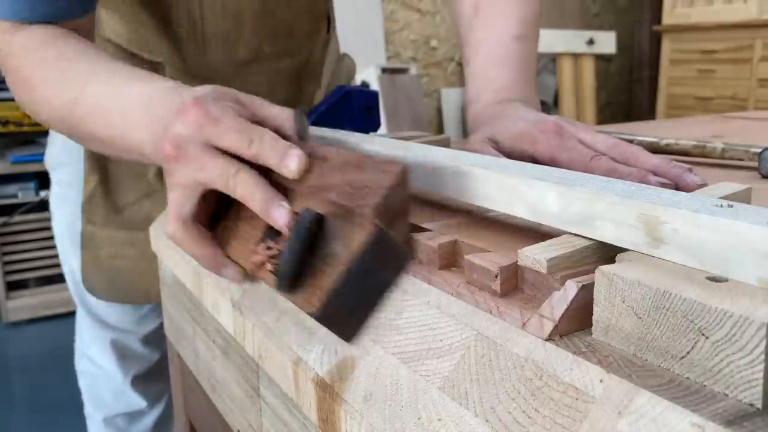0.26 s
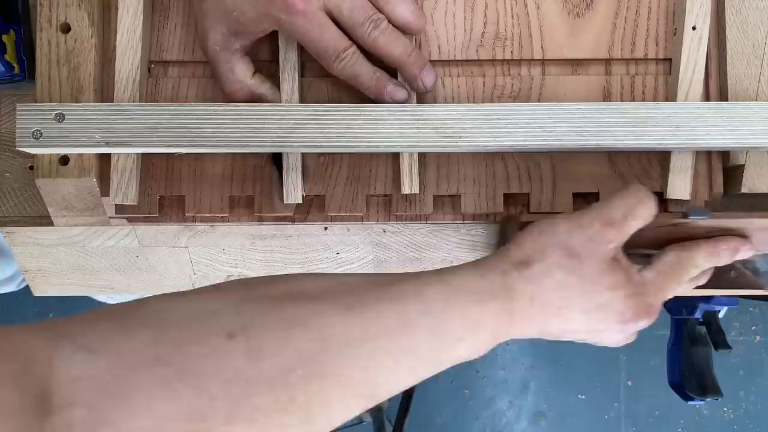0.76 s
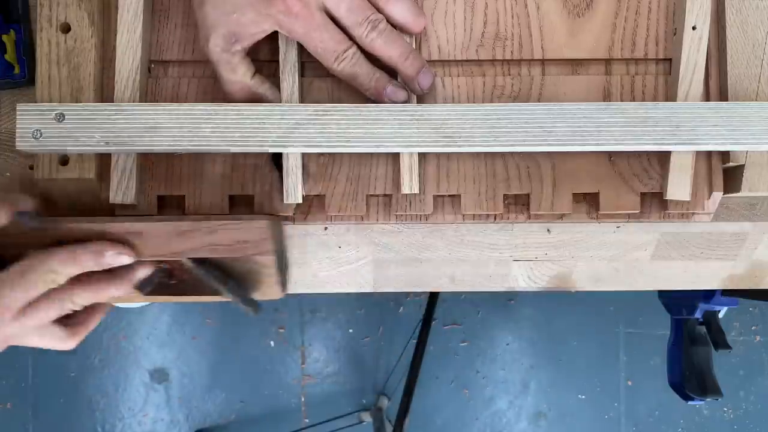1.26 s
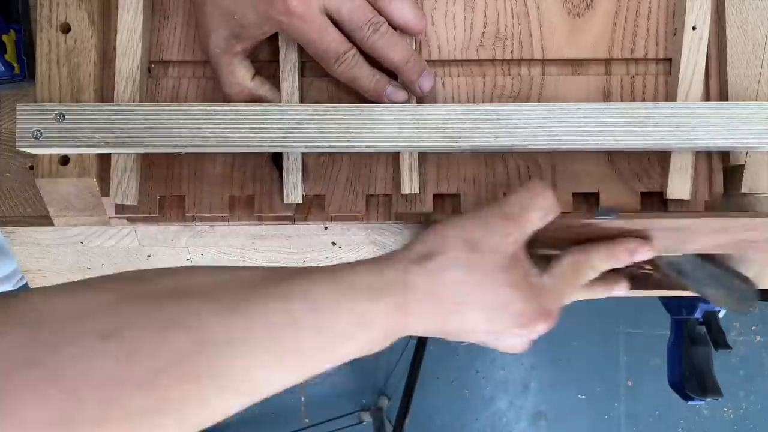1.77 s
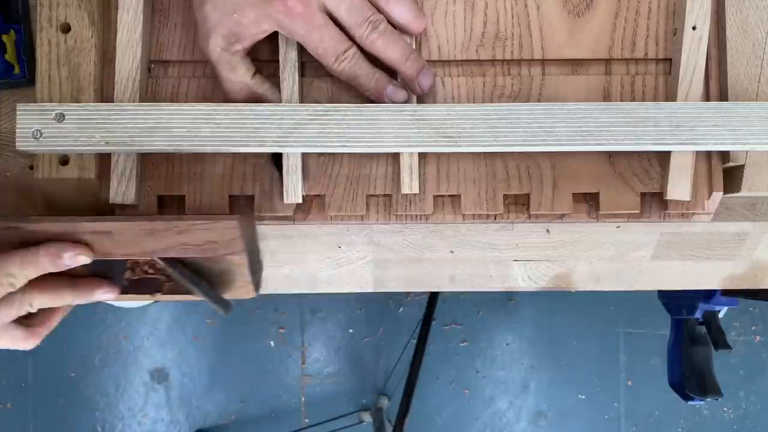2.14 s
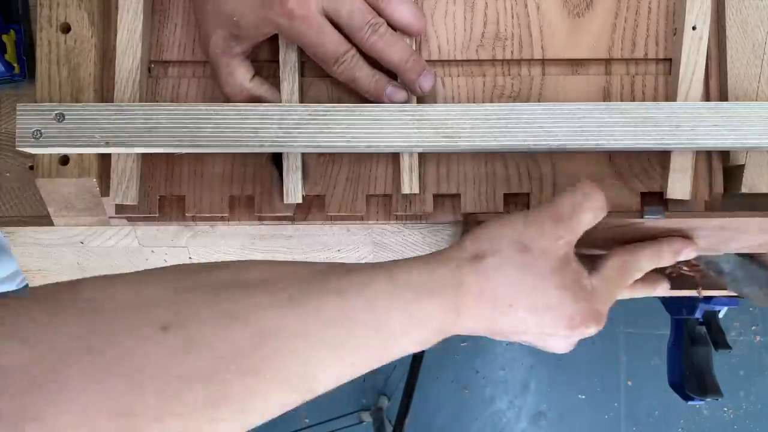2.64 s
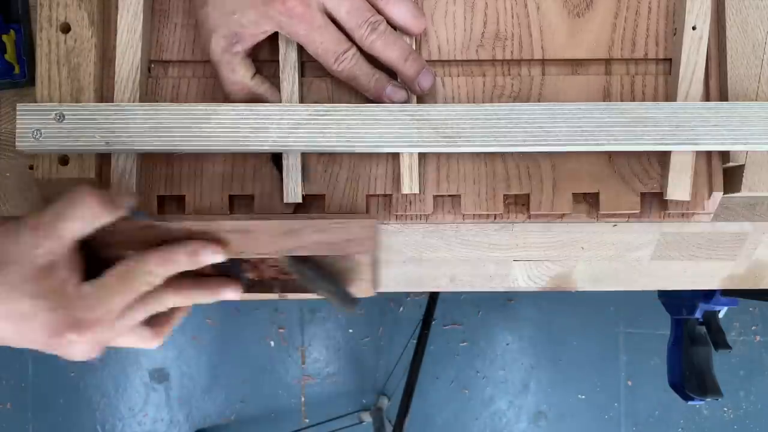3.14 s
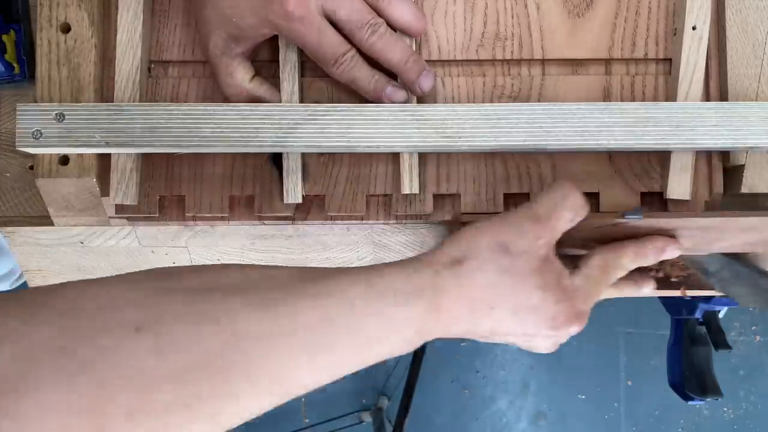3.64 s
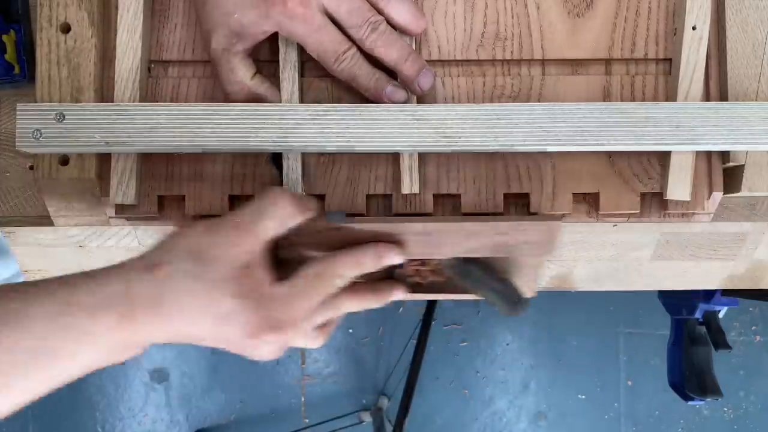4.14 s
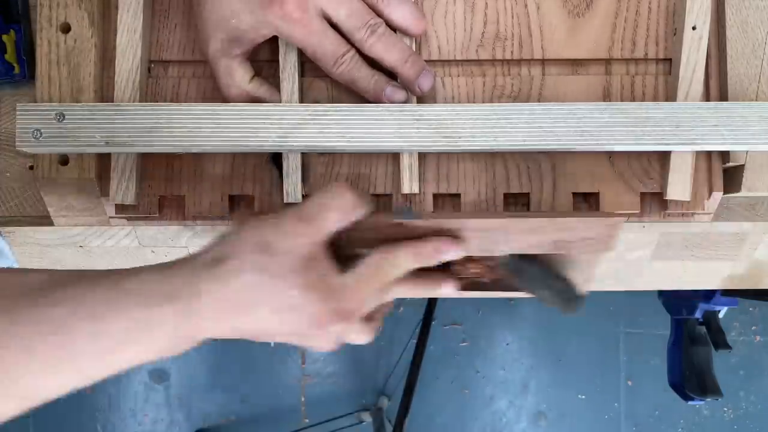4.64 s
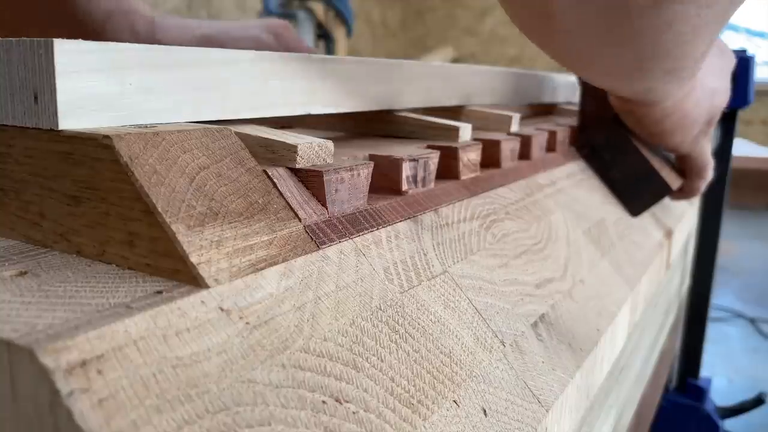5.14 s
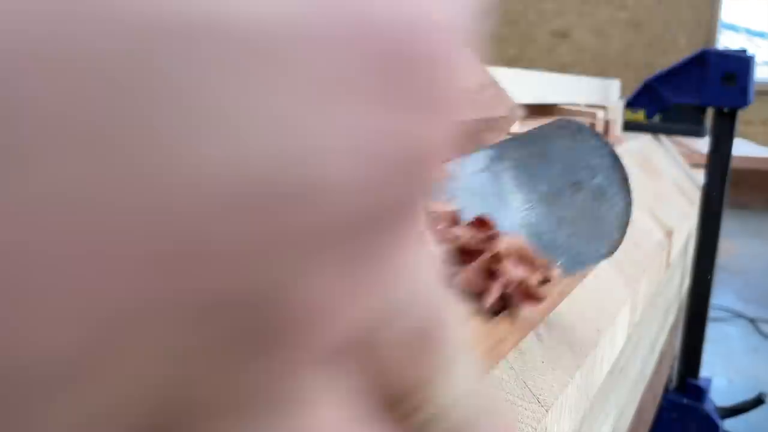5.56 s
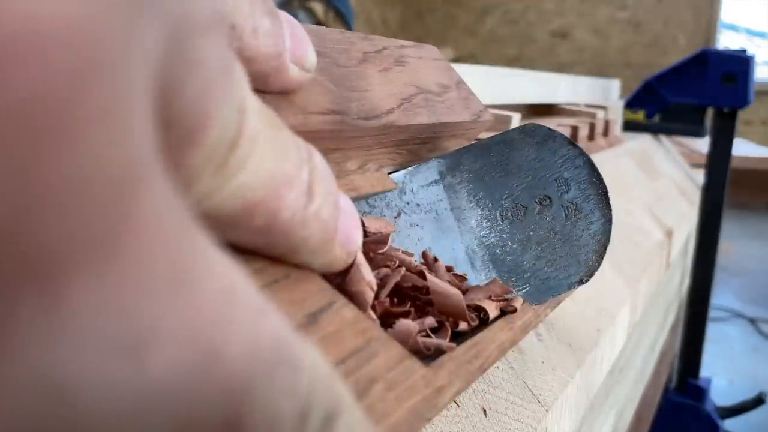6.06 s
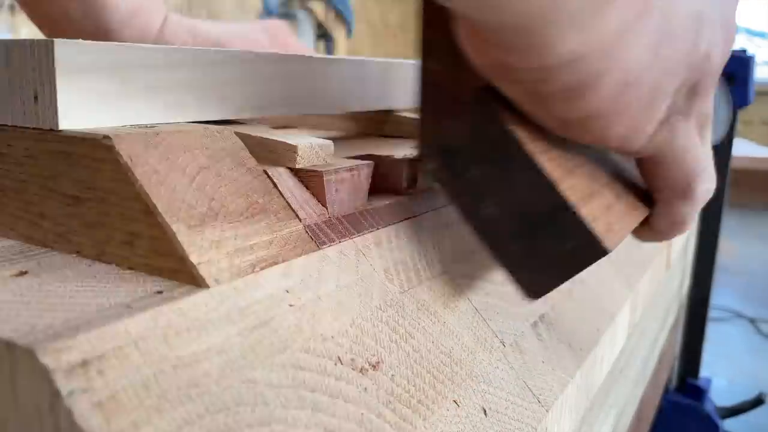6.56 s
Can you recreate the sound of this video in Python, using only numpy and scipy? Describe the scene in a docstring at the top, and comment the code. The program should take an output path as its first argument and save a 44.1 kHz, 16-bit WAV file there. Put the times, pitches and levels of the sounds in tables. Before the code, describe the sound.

Close stereo pickup of a small hand plane on a wooden bench. Three quick, bright, hurried rasps come first, then five longer, lower scrapes about a second apart. Between them the sole slides back with small dry knocks and papery shavings rustle over a faint, buzzy low rumble. After five seconds there is one crisp clatter and rustle, then only the weak rumble, fading.

```python
"""First comes the rasp of a small hand plane stroked along a board edge, over a faint bass floor.
Torn wood fibres make lumpy noise that rings the board and the iron (the blade). The rasps are
spliced in at three playback speeds, with the left side a few milliseconds late.
From .8 s the sole (the plane's underside) slides and knocks and shavings rustle, as shaped noise.
This bench layer and a room rumble are chopped by a buzz of short loud windows; the rumble sinks at the end."""
import sys
import numpy as np
from scipy import signal
from scipy.fft import rfft, irfft, next_fast_len
from scipy.io import wavfile
from scipy.ndimage import uniform_filter1d, map_coordinates

SR = 44100
rng = np.random.default_rng(int(sys.argv[2]) if len(sys.argv) > 2 else 0)


def attenuation_scalar(level_db):
    """Turn a level in dB into a linear amplitude multiplier (20 dB per decade)."""
    decades = np.asarray(level_db, float) / 20
    return 10 ** decades


def master_out(mix):
    """Clip the mix to full scale and print it as 16-bit PCM to the path in sys.argv[1]."""
    frames = np.transpose(np.atleast_2d(mix))
    ceiling = np.clip(frames, -1, 1)
    pcm = np.round(ceiling * 32767).astype(np.int16)
    wavfile.write(sys.argv[1], SR, pcm)


N = 299859  # length [samples]

# All levels in the tables are relative: the functions below mix them further.
# Splices of the rasp: (start [s], end [s], playback speed, motor hum [dB])
RASP_SPLICES = [(0, .798, 1.368, -61), (.798, 1.213, 1.185, -68), (1.733, 2.09, 1, -63),
                (2.648, 3.024, 1, -61), (3.625, 4.024, 1, -70), (4.562, 4.876, 1, -74)]
# Strokes of the iron, the second a short pull back:
# (bite [s], length [s], level [dB], sag up to the lift [dB], highest chatter centre [Hz])
STROKES = [(.002, 0.18, -22.5, 3.5, 5300), (0.337, 0.092, -32.5, -5, 4600), (0.563, 0.13, -21, 4.5, 5420),
           (0.889, 0.22, -23, 2, 4650), (1.759, 0.25, -25.5, 2.5, 3920), (2.657, 0.29, -23, 1.5, 4000),
           (3.667, 0.25, -22.5, 2, 3785), (4.575, 0.2, -20.5, 5.5, 4170)]
# The iron snags in harder grain: (peak [s], 20 dB rise [s], 20 dB fall [s], level [dB], board share [dB])
GRAIN_SNAGS = [(.09, 0.13, 0.04, -21, -13.5), (0.331, 0.066, 0.013, -33.5, 8),
               (.385, .17, 0.12, -31.5, 5.5), (0.452, 0.045, 0.0085, -25.5, 7.5),
               (.59, .03, 0.017, -28.5, 4.5), (.629, 0.04, 0.089, -24.5, -8.5),
               (0.675, 0.05, 0.029, -14.5, -18.5), (0.717, 0.042, 0.084, -25.5, 0),
               (0.793, 0.061, 0.006, -25.5, -12.5), (.985, 0.097, 0.14, -22, -13.5),
               (1.85, 0.1, 0.057, -23.5, 2.5), (1.881, .05, 0.071, -20.5, -17),
               (1.938, 0.053, 0.095, -24, -4.5), (2.059, .06, 0.022, -25, -9),
               (2.668, 0.018, 0.011, -19.5, -3), (2.75, .06, 0.12, -29, -1.5),
               (2.816, 0.1234, 0.05, -23.5, -17.5), (3.761, .06, 0.28, -24.5, -11.5),
               (4.64, 0.053, 0.13, -34, -10.5), (4.675, .05, 0.036, -26, 6), (4.715, .08, 0.048, -25, -12),
               (4.789, .05, 0.092, -21, -8)]
# A bundle of fibres snaps under the edge: (time [s], level [dB])
FIBRE_SNAPS = [(.4505, -3), (.613, -5), (.629, -3), (.970, -3), (.994, -2), (1.880, -4), (1.934, -3),
               (2.693, -5), (2.815, -3), (3.749, -4), (3.762, -4), (3.789, -2), (4.607, -6), (4.631, -3),
               (4.717, -6)]
# Resonances of the board at playback speed 1: (frequency [Hz], width [Hz], level [dB])
BOARD_MODES = [(190, 110, -12.5), (328, 25, -9.5), (584, 420, -13), (880, 240, -2.5), (1420, 770, -8.5),
               (1614, 260, 3.5), (1960, 550, -9.5)]
# Resonances of the iron at playback speed 1: (frequency [Hz], width [Hz], level [dB])
IRON_MODES = [(2430, 77, -14.5), (3030, 546, 2.5), (3140, 110, -18.5), (3786, 380, 2), (4205, 300, -6),
              (4584, 300, -4), (5300, 1000, -11)]
# Upper resonances of the iron at playback speed 1: (frequency [Hz], width [Hz], level [dB])
IRON_OVERTONES = [(5290, 400, -5.5), (6380, 280, 5.5), (7470, 450, -5)]
# Colour of the fine fibre noise at playback speed 1: (frequency [Hz], level per Hz [dB])
FIBRE_COLOUR = [(4500, -29), (5800, 8), (6800, 4), (8300, -9.5), (9000, -25), (10500, -36.5)]
# Colour of the broad tearing noise at playback speed 1: (frequency [Hz], level per Hz [dB])
TEARING_COLOUR = [(120, -39.5), (250, -9), (1000, -0.5), (3500, 4), (8600, -3), (9200, -27.5), (14000, -40)]
# Sole or shavings tick on the bench: (time [s], peak [dB], bright share [dB])
BENCH_KNOCKS = [(1.325, -40.5, -15), (1.355, -36, -17.5), (1.412, -27, -6.5), (1.448, -33, -5),
                (1.48, -26, -27.5), (1.509, -31.5, -12.5), (1.549, -40.5, -7.5), (1.581, -41, -10.5),
                (2.231, -39.5, -5.5), (2.267, -40.5, -12.5), (2.295, -45, 1), (2.315, -44.5, -1),
                (2.333, -44, 0), (2.454, -41, -4), (3.121, -46, -15.5), (3.344, -44, 5), (3.414, -25, -9),
                (3.591, -35.5, -14), (4.079, -40.5, -32), (4.125, -34, -19.5), (4.255, -46.5, -22.5),
                (4.304, -42.5, -1.5), (4.334, -43.5, 9), (5.324, -31, -15), (5.478, -36, 13.5),
                (5.585, -40.5, 16), (6.365, -52, -35)]
# The plane slides, shavings curl out and settle; rise and fall span 20 dB:
# (peak [s], rise [s], fall [s], level [dB], fineness [0 sole, 1 shavings, 2 dust])
BENCH_RUSTLES = [(1.014, 0.11, 0.11, -33.5, 2), (1.22, 0.34, 0.18, -80.5, 0.82),
                 (1.328, 0.006, 0.18, -46.5, 1.6), (1.40, 0.12, 0.098, -45.5, 0.068),
                 (1.488, .045, 0.069, -38, 0.028), (1.57, .15, .07, -45, 0.39),
                 (1.936, 0.096, 0.097, -30.5, 2), (2.1, 0.19, .08, -58.5, 0.64),
                 (2.235, 0.013, 0.31, -54, 0.096), (2.29, 0.055, 0.17, -46.5, 1.7),
                 (2.386, 0.028, 0.093, -46.5, 2), (2.441, 0.1, .1, -42, 0.51),
                 (2.46, .02, 0.046, -38, 0.92), (2.814, 0.06, 0.11, -28.5, 2), (3.036, .3, .14, -66, 0.47),
                 (3.125, .015, 0.33, -57, 0), (3.213, 0.045, 0.24, -39.5, 1.38),
                 (3.352, .02, 0.062, -34, 2), (3.414, 0.075, .065, -38.5, 0.38),
                 (3.595, 0.0073, .04, -44, 0), (3.761, 0.058, .12, -27.5, 2), (4.036, .3, .06, -72, 0.15),
                 (4.082, 0.007, 0.056, -55.5, 0), (4.266, 0.013, 0.1, -54.5, 0.048),
                 (4.307, .005, 0.09, -41, 0.47), (4.54, .05, .1, -52, 0.042), (4.744, .12, 0.074, -27, 2),
                 (5.07, 0.029, 0.052, -54.5, 0.067), (5.285, 0.032, .3, -40.5, 0),
                 (5.335, 0.028, 0.055, -22.5, 0.15), (5.398, 0.058, 0.23, -27.5, .6),
                 (5.48, .1, .1, -34, 1.4), (5.524, 0.12, 0.1, -20.5, 0.92), (5.6, .05, 0.1, -46, 0.031),
                 (5.7, .1, .25, -64.5, 1), (6.17, 0.012, .04, -75.5, .2), (6.4, 0.055, .03, -64, 0.042)]
# Bench at rest, one row for each listening place: (sole [dB], shavings [dB], dust [dB])
STILL_BENCH = [(-77.5, -82.5, -90.5), (-83.5, -91.5, -96)]
# Resonances of the plane's body when knocked: (frequency [Hz], width [Hz], level [dB])
BODY_MODES = [(299.7, 93, -5.5), (660, 67, 1)]
# Colour of the sliding sole; the plane's body rings near 665 Hz: (frequency [Hz], level per Hz [dB])
SOLE_COLOUR = [(150, -21.5), (300, -9), (590, -6.5), (665, 5), (750, -7), (1900, -5.5), (3200, -8),
               (4500, -14.5), (7000, -42)]
# Colour of the shavings: (frequency [Hz], level per Hz [dB])
SHAVINGS_COLOUR = [(2500, -29), (4000, -2), (5500, 4.5), (7800, 1), (9500, -4.5), (12000, -39.5)]
# Colour of the dust: (frequency [Hz], level per Hz [dB])
DUST_COLOUR = [(6500, -17.5), (9500, -0.5), (11500, -6.5), (13000, -7), (15800, -8)]
# Colour of the bench heard along the board, the plane's mouth ringing: (frequency [Hz], gain [dB])
ALONG_BOARD_COLOUR = [(100, -15), (665, -12.5), (1500, -5), (2900, -2.5), (4700, -2), (5600, 1), (6500, 1),
                      (16000, -7.5)]
# Rumble level, one list for each listening place: (time [s], level [dB])
RUMBLE_LEVELS = [
    [(0.86, -63.5), (3.03, -61), (4.86, -62)],
    [(4.9, -62.5), (5.444, -61.5), (6.8, -71)],
]
# Colour of the rumble at the first listening place: (frequency [Hz], level per Hz [dB])
RUMBLE_COLOUR = [(15, -5), (28, 0), (65, -10.5), (95, -7.5), (140, -14.5), (200, -22), (500, -24.5),
                 (2000, -48), (6000, -46)]
# Colour of the rumble at the last listening place: (frequency [Hz], level per Hz [dB])
LAST_RUMBLE_COLOUR = [(2, -4.5), (18, -5.5), (32, -0.5), (45, -22.5), (65, -0.5), (100, -23.5), (300, -26),
                      (2000, -42.5), (6000, -53)]
# Chopping, one row for each listening place: (start [s], end [s], windows per second [Hz], open share [0 to 1])
CHOPPING = [(.8, 4.876, 501.1, .11), (4.876, 6.8, 300.6, .1)]

LAST_PLACE_S = CHOPPING[1][0]  # from here on the bench is heard along the board
HUM_HZ, LAST_HUM_HZ = 53, 76.5  # motor hum in the rasp at speed 1, and in the last rumble
LAG_S = 160 / 44100  # how late the left side of the rasp is at speed 1
# The sole creeps up to the edge before the bite; levels relative to the stroke
CREEP_S, START_DB, CREEP_DB, TOUCH_DB, ATTACK_S = 0.042, -42, -23, -19.5, 0.0023
ARCH_DB, FASTEST = 2.5, 0.63  # the cut swells where the hand is fastest, at this share of the stroke
RELEASE_S, TAIL_DB, TAIL_S, TAIL_END_DB = 0.059, -19, .06, -22.5  # the iron lifts, the sole trails
# Chatter centre at speed 1 at the bite, the lift and after, and how far it wanders
BITE_HZ, LIFT_HZ, TRAIL_HZ, WANDER_OCTAVES = 2900, 3050, 3460, 0.079
DIG_S, SLOWING = 0.024, 0.78  # chatter climbs after digging in (speed 1), sinks from this share of the stroke
BOARD_SLOW_DB, BOARD_FAST_DB = -6.5, -10.5  # share of the board when the hand is slow and fast
SPRAY_DB, SPRAY_S = -23, .03  # dusty hiss under the cut, and its fade in and out
GRITS, GRIT_DB, GRIT_SPREAD_DB = 300, -6.5, 7.5  # number of crumbs under the sole, their level and spread
FINENESS_DB = 10.5  # loss of a layer per step away from the fineness
SLIDE_RING_DB = -6.5  # board and iron ring under the sliding sole


def unit(x):
    """Scale to an rms (average strength) of 1."""
    return x / np.sqrt(np.mean(x ** 2) + 1e-20)


def shape(points):
    """Gain curve through (frequency, dB) points on a log axis, nearly silent outside them."""
    f, db = np.transpose(points)
    return lambda hz: attenuation_scalar(np.interp(np.log(hz + 1), np.log(f), db, left=-90, right=-90))


def modes(table):
    """Sum of resonances with alternating signs, each a peak in the frequency response."""
    def response(f):
        return sum((-1) ** k * attenuation_scalar(db) * 1j * f * width / (hz * hz - f * f + 1j * f * width)
                   for k, (hz, width, db) in enumerate(table))
    return response


def curves(rows, t):
    """One value per time for each column after the first."""
    times, *columns = np.transpose(rows)
    return [np.interp(t, times, column) for column in columns]


def filtered(x, response):
    """Multiply the spectrum of x by a response given as a function of frequency."""
    n = x.shape[-1]
    m = next_fast_len(n + 4096)  # spare room so that tails do not wrap round at once
    return irfft(rfft(x, m) * response(np.fft.rfftfreq(m, 1 / SR)), m)[..., :n]


def late(x, seconds):
    """Delay x by turning the phase of each frequency."""
    return filtered(x, lambda hz: np.exp(-2j * np.pi * hz * seconds))


def wobble(n, rate):
    """A smooth random curve through a number of random points per second (rate)."""
    points = rng.standard_normal(int(n * rate / SR) + 4)
    return map_coordinates(points, [np.arange(n) * rate / SR])


def grainy(n, rate, depth_db):
    """Noise whose strength jumps about, rate times a second."""
    return rng.standard_normal(n) * attenuation_scalar(depth_db * wobble(n, rate))


def bursts(rows, rise_s, fall_s):
    """An envelope that jumps up at each (time, dB) and dies away."""
    marks, t = np.zeros(N), np.arange(SR // 10) / SR
    for s, db in rows:
        marks[round(s * SR)] = attenuation_scalar(db)
    return signal.fftconvolve(marks, (1 - np.exp(-t / rise_s)) * np.exp(-t / fall_s))[:N]


def tents(rows, t):
    """One envelope a row: straight in dB up to the peak and down again."""
    s, rise, fall, db = np.transpose(rows)[:4, :, None]
    return attenuation_scalar(db - 20 * np.where(t < s, (s - t) / np.abs(rise), (t - s) / np.abs(fall)))


def ringing(drive, table, speed, rate, depth_db, centre_hz=None, focus_db=0):
    """Each mode rings in fits of its own, the more the nearer it lies to any chatter centre; level kept even."""
    gains = np.array([attenuation_scalar(db + depth_db * wobble(len(drive), rate)) for _, _, db in table])
    if centre_hz is not None:
        # focus_db is lost per octave away from the centre
        gains = gains * [attenuation_scalar(-focus_db * np.abs(np.log2(centre_hz / (hz * speed)))) for hz, _, _ in table]
    gains = gains / np.sqrt(uniform_filter1d(np.sum(gains ** 2, 0), size=500))
    total = np.zeros(len(drive))
    for k, (gain, (hz, width, _)) in enumerate(zip(gains, table)):
        mode = modes([(hz * speed, width * speed, 0)])
        total += filtered((-1) ** k * gain * drive, lambda f: mode(f) ** 2)
    return unit(total)


def bass_floor():
    """Faint low-coloured noise on both sides, only under the opening."""
    noise = filtered(rng.standard_normal((2, N)), shape(RUMBLE_COLOUR))
    return attenuation_scalar(-62) * unit(noise) * (np.arange(N) < .85 * SR)


def cut(t, speed):
    """Force on iron and board, and chatter centre: creep, bite, swell, lift and trail, with snags on top."""
    inside = [row for row in GRAIN_SNAGS if t[0] <= row[0] < t[-1]]
    snags = tents(inside, t)
    # forces are added as powers
    iron = np.sum(snags ** 2, 0)
    board = attenuation_scalar(2 * np.transpose(inside)[4]) @ snags ** 2
    centre = []
    for s, length, db, sag_db, top_hz in [row for row in STROKES if t[0] <= row[0] < t[-1]]:
        fast, lift = s + FASTEST * length, s + length
        times = [s - 3 * CREEP_S, s - CREEP_S, s - ATTACK_S, s,
                 fast, lift, lift + RELEASE_S, lift + RELEASE_S + TAIL_S]
        levels = [START_DB, CREEP_DB, TOUCH_DB, 0,
                  ARCH_DB - FASTEST * sag_db, -sag_db, TAIL_DB, TAIL_END_DB]
        force = attenuation_scalar(db + np.interp(t, times, levels)) * (t > times[0]) * (t < times[-1] + TAIL_S)
        iron = iron + force ** 2
        share_db = np.interp(t, [s, fast, lift], [BOARD_SLOW_DB, BOARD_FAST_DB, BOARD_SLOW_DB])
        board = board + (force * attenuation_scalar(share_db)) ** 2
        centre += [(s + DIG_S / speed, BITE_HZ * speed), (s + 2 * DIG_S / speed, top_hz),
                   (s + SLOWING * length, top_hz),
                   (lift, LIFT_HZ * speed), (lift + RELEASE_S, TRAIL_HZ * speed)]
    wander = 2 ** (WANDER_OCTAVES * wobble(len(t), 24))
    return np.sqrt(iron), np.sqrt(board), curves(centre, t)[0] * wander


def rasp():
    """Fibres tear in lumps and shake board and iron; playback speed scales every resonance, the hum and the lag."""
    out = np.zeros((2, N))
    snaps = bursts(FIBRE_SNAPS, rise_s=0.0005, fall_s=0.00081) * rng.standard_normal(N)
    for start, end, speed, hum_db in RASP_SPLICES:
        a, b = round(start * SR), round(end * SR)
        n, t = b - a, np.arange(a, b) / SR
        iron_force, board_force, centre_hz = cut(t, speed)
        tear = grainy(n, 170, 1.1) * attenuation_scalar(1.8 * wobble(n, 900))  # single fibres crackle inside the lumps
        iron = ringing(tear, IRON_MODES, speed, 45, 7, centre_hz, focus_db=25)
        upper = ringing(tear, IRON_OVERTONES, speed, 30, 6)
        board = ringing(tear, BOARD_MODES, speed, 30, 3.5)
        fibre_noise = tear * attenuation_scalar(2.4 * wobble(n, 40))
        fibres = unit(filtered(fibre_noise, lambda hz: shape(FIBRE_COLOUR)(hz / speed)))
        broad = unit(filtered(tear, lambda hz: shape(TEARING_COLOUR)(hz / speed)))
        blade = iron + attenuation_scalar(-15.0) * upper + attenuation_scalar(-17.5) * fibres + attenuation_scalar(-6.5) * broad
        near = attenuation_scalar(-4.0) * (iron_force * blade + attenuation_scalar(-1.54) * board_force * board)
        struck = modes([(hz * speed, width * speed, db)
                        for hz, width, db in BOARD_MODES + IRON_MODES + IRON_OVERTONES])
        near = near + attenuation_scalar(5) * filtered(snaps[a:b], struck)
        hum = attenuation_scalar(hum_db + 2.2 * wobble(n, 12)) * np.sin(2 * np.pi * HUM_HZ * speed * t)
        hum = hum * (np.abs(t - .71) > .09)  # the hum is silent for a moment
        # walls reach the two sides unlike
        side = attenuation_scalar(-23.0) * late(near, 0.019) + attenuation_scalar(-25.0) * late(near, 0.043)
        out[0, a:b] = late(near + side + hum, LAG_S / speed)
        out[1, a:b] = near - side + hum
    return out


def rustling():
    """Levels of sole, shavings and dust; a rustle ends where the listening place changes."""
    step = 32  # samples between computed levels
    t, rows = np.arange(0, N + step, step) / SR, np.array(BENCH_RUSTLES)
    last_place = t >= LAST_PLACE_S
    same_place = (rows[:, :1] >= LAST_PLACE_S) == last_place
    power = (tents(rows, t) * same_place) ** 2
    shares = attenuation_scalar(-FINENESS_DB * np.abs(rows[:, 4] - np.arange(3)[:, None]))
    still = attenuation_scalar(np.transpose(STILL_BENCH)[:, 1 * last_place])
    levels = np.sqrt(shares ** 2 @ power + still ** 2)
    for s, length, db, sag_db, _ in STROKES:  # each stroke heard after .8 s has a dusty hiss under it
        fade = np.interp(t, [s, s + SPRAY_S, s + length, s + length + SPRAY_S], [0, 1, attenuation_scalar(-sag_db), 0])
        levels[-1] = np.hypot(levels[-1], attenuation_scalar(db + SPRAY_DB) * fade)
    return [np.interp(np.arange(N) / SR, t, level) for level in levels]


def bench():
    """The sole rubs in jerks and ticks on the bench, curled shavings rustle in the mouth; noise for two sides."""
    rub, shavings, dust = rustling()
    # crumbs caught under the sole tick at random
    grit = rng.uniform(size=(GRITS, 2)) * [N / SR - .01, GRIT_SPREAD_DB]
    ticks = unit(1 + np.tanh(attenuation_scalar(GRIT_DB) * bursts(grit, rise_s=0.0011, fall_s=0.0036)))
    rub, shavings, dust = ticks * rub, np.sqrt(ticks) * shavings, ticks * dust
    jerks, slips = wobble(N, 70), wobble(N, 28)
    peaks = [row[:2] for row in BENCH_KNOCKS]
    dull = bursts(peaks, rise_s=0.0014, fall_s=0.0029)
    bright = bursts([(s, db + share_db) for s, db, share_db in BENCH_KNOCKS], rise_s=.0006, fall_s=0.0021)
    rub = rub * attenuation_scalar(-1.5 + 2.5 * slips + 0.8 * jerks) + attenuation_scalar(-9.0) * dull
    shavings = shavings * attenuation_scalar(-2.0 + 1.4 * slips + 0.89 * jerks) + attenuation_scalar(-4.5) * bright
    dust = dust * attenuation_scalar(-0.27 + 0.73 * jerks) + attenuation_scalar(-4.0) * bright
    thud = attenuation_scalar(-9.0) * filtered(bursts(peaks, rise_s=.0003, fall_s=.0004), modes(BODY_MODES))
    sides = []
    for _ in range(2):
        sole_ring = ringing(grainy(N, 130, 2), BOARD_MODES[3:] + IRON_MODES[:4], 1, 20, 8)
        shaving_ring = ringing(grainy(N, 130, 1), IRON_MODES[3:] + IRON_OVERTONES, 1, 20, 6)
        sole_noise = unit(filtered(grainy(N, 130, 2.8), shape(SOLE_COLOUR)))
        shaving_noise = unit(filtered(grainy(N, 87, 1.2), shape(SHAVINGS_COLOUR)))
        dust_noise = unit(filtered(grainy(N, 63, 1.4), shape(DUST_COLOUR)))
        rings = attenuation_scalar(SLIDE_RING_DB) * (rub * sole_ring + shavings * shaving_ring)
        sides.append(thud + rings + rub * sole_noise + shavings * shaving_noise + dust * dust_noise)
    slides = np.array(sides)
    along_board = filtered(slides, shape(ALONG_BOARD_COLOUR))
    return np.where(np.arange(N) < LAST_PLACE_S * SR, slides, along_board)


def rumble():
    """Low workshop noise; from the last listening place a gently wavering motor hum stands out."""
    t = np.arange(N) / SR
    first_noise, last_noise = [unit(filtered(rng.standard_normal(N), shape(colour)))
                               for colour in (RUMBLE_COLOUR, LAST_RUMBLE_COLOUR)]
    phase = 2 * np.pi * LAST_HUM_HZ * t + 0.65 * wobble(N, 5.6)
    hum = attenuation_scalar(-4.0 + 1.4 * wobble(N, 6)) * np.sin(phase)
    first = attenuation_scalar(curves(RUMBLE_LEVELS[0], t)[0] + 9) * first_noise
    last = attenuation_scalar(curves(RUMBLE_LEVELS[1], t)[0] + 4.0) * (last_noise + hum)
    return np.where(t < LAST_PLACE_S, first, last)


def chopped(near, far, low):
    """Short windows let the bench through louder; the left side hears the right one window later.
    The bass lies on the left, dips there in each window and comes up on the right upside down."""
    out, t = np.zeros((2, N)), np.arange(N) / SR
    for start, end, rate, share in CHOPPING:
        window = uniform_filter1d(1. * (t * rate % 1 < share), size=2)
        right = (attenuation_scalar(-5.0) + attenuation_scalar(9.0) * window) * near
        left = 0.41 * late(right, 1 / rate) + 0.12 * right + (attenuation_scalar(0.5) + attenuation_scalar(2.0) * window) * far
        left = left + low - window * (1.2 * low - .4 * late(low, 1 / rate))
        right = right + (attenuation_scalar(-21.5) - attenuation_scalar(-8.5) * window) * low
        out += np.array([left, right]) * ((t >= start) & (t < end))
    return out


def scene():
    """Spliced rasps over the chopped bench sound and rumble, above a faint bass floor."""
    floor = bass_floor()
    rasps = rasp()
    near, far = bench()
    return rasps + chopped(near, far, rumble()) + floor


def low_pass(x):
    """Removes everything above the highest recorded frequency."""
    return signal.sosfilt(signal.butter(12, 15920, fs=SR, output="sos"), x)


def record(dry):
    """Turn the finished mix into the sound that is written out."""
    return low_pass(dry)


dry = scene()
out = record(dry)
master_out(out)
```